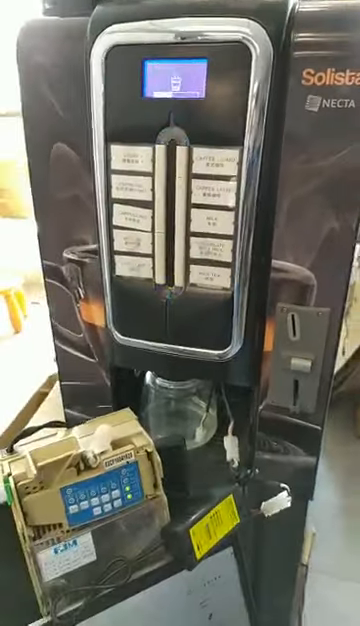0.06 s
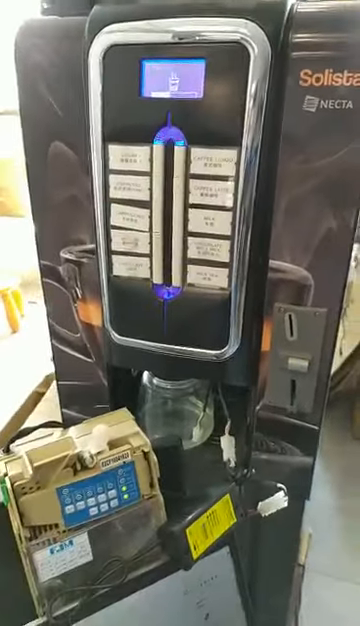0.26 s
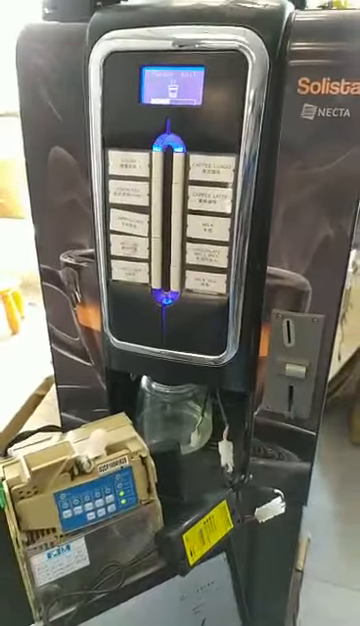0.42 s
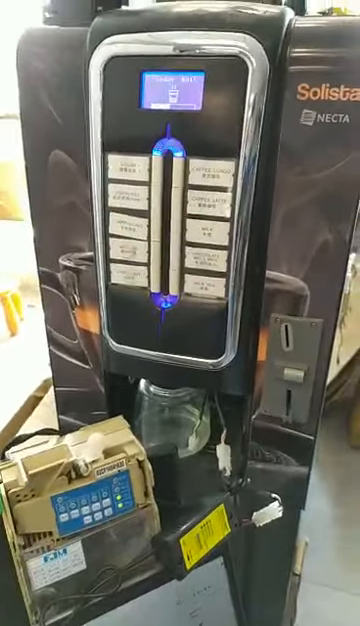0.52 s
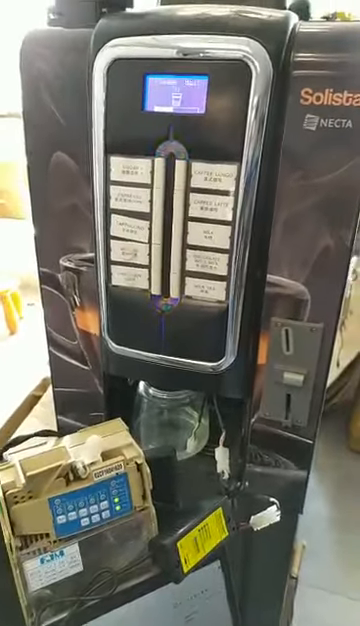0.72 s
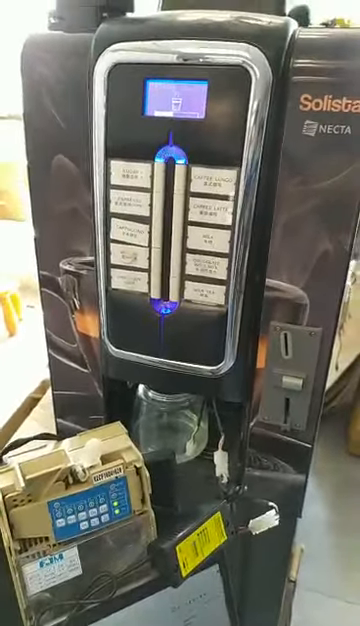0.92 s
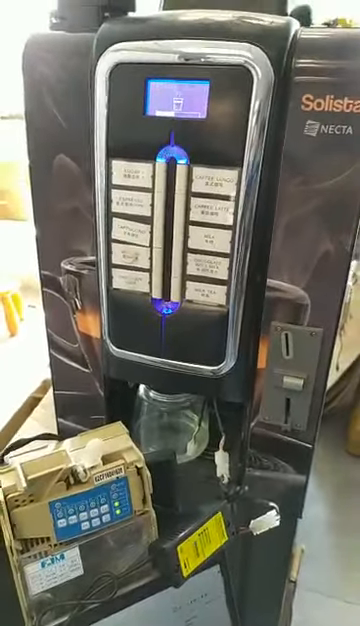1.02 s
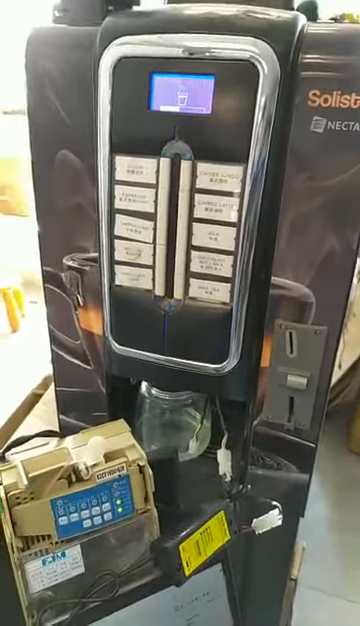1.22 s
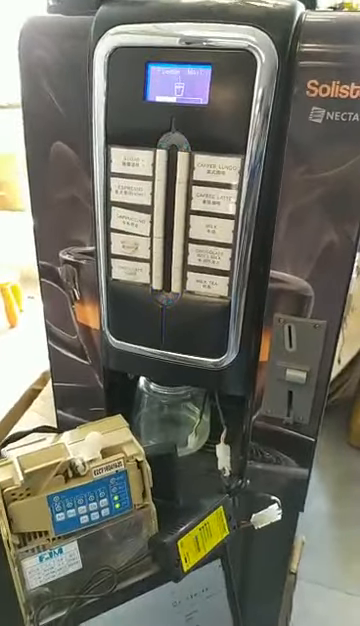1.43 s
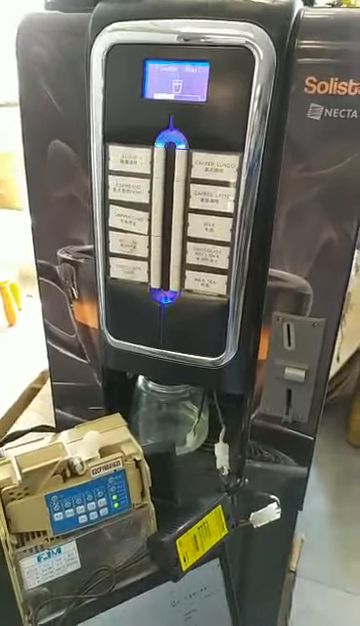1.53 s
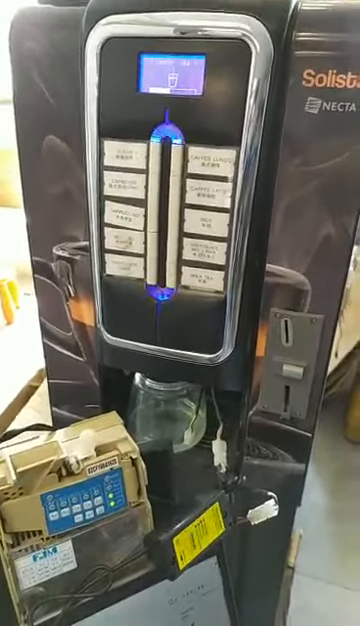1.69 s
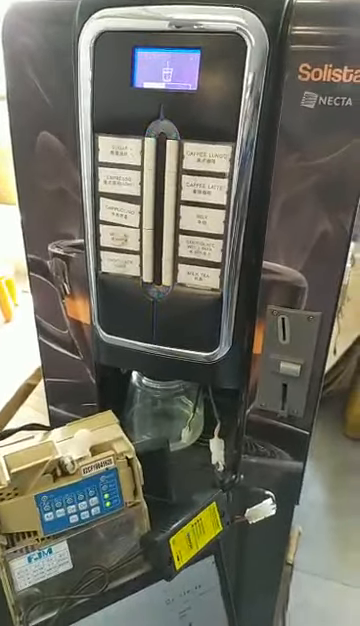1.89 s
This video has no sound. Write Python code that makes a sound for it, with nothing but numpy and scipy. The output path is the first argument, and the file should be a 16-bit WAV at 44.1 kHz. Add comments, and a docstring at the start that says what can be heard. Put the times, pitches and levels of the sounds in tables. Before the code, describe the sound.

Two hard metallic clacks from a drinks machine mechanism in a quiet, humming room.

```python
"""A quiet room with a drinks vending machine: a solenoid (a magnet that moves a metal plunger) pulls in
and, under a second later, lets go. Each stroke is a dull lead-in, then a hard, chattering clack that
rings the panels and thumps the cabinet; the room echoes briefly. Underneath run the room's air,
a low hum, a fan and a thin electrical whine. Faint ticks, a bump and a squeak come and go."""
import sys
import numpy as np
from scipy import signal
from scipy.fft import rfft, irfft, next_fast_len
from scipy.io import wavfile
from scipy.ndimage import uniform_filter1d, map_coordinates

SR = 44100
rng = np.random.default_rng(int(sys.argv[2]) if len(sys.argv) > 2 else 0)


def unload_audio(sound):
    """Save the sound as a 16-bit wav file, at the path given as the first command line argument."""
    columns = np.transpose(np.atleast_2d(sound))
    # keep every value between -1 and 1, then stretch to whole-number steps
    steps = np.round(np.clip(columns, -1, 1) * 32767)
    wavfile.write(sys.argv[1], SR, steps.astype(np.int16))


N = 85995

# tone colour of each noise: f/Hz, relative level/dB
AIR_COLOUR = [(150, -13), (250, -6.5), (370, -1), (550, -6), (800, -2.5), (1130, -7.5), (1400, -10.5),
              (2300, -9), (3000, -12), (4000, -12.5), (5500, -12), (8000, -16), (11000, -20.5),
              (14000, -26), (15800, -31)]
RUMBLE_COLOUR = [(20, -61), (33, -32), (45, -16), (70, 9.5), (110, -1), (165, 1), (230, -1), (320, -16),
                 (600, -52)]
KNOCK_COLOUR = [(150, -14), (450, -22), (680, -10), (830, -3), (1080, 7.5), (1350, -12.5), (2300, -11.5),
                (4200, -15), (6000, -16), (10000, -14), (15000, -33)]
TICK_COLOUR = [(1500, -25), (5000, -11), (11000, 7), (15500, -8)]
PULL_IN_COLOUR = [(180, -36), (300, -3.5), (592, -14.5), (990, 1), (1380, -18.5), (1710, -11.5),
                  (2770, -9.5), (3160, -9.5), (4120, 1.5), (4870, -7.5), (6040, -5), (7010, -8),
                  (14100, -12.5), (15800, -14)]
RELEASE_COLOUR = [(180, -47), (300, -23), (643, -14), (1090, 0), (1430, -20.5), (1710, -6.5), (2680, -13.5),
                  (2960, -4), (3210, -9.5), (3490, -4.5), (5290, -10), (5840, -11), (9770, -10.5),
                  (15800, -19.5)]
THUMP_COLOUR = [(40, -22), (90, -0.5), (140, 2), (215, 0.5), (330, -9.5), (600, -15.5), (1500, -64)]
BUMP_COLOUR = [(200, -21), (400, -6), (620, 9), (1000, -9), (2600, -9), (6000, -30)]
# how the background sounds swell and fade: t/s, level/dB
AIR_LEVEL = [(0, -56.5), (.15, -60.5), (.6, -60), (1.0, -60), (1.65, -60.5), (1.8, -58), (1.95, -53.5)]
RUMBLE_LEVEL = [(0, -52.5), (.15, -59), (1.0, -59.5), (1.7, -57.5), (1.95, -56.5)]
HUM_LEVEL = [(0.0, -64), (0.232, -55.5), (0.324, -50.5), (0.346, -65), (0.384, -53.5), (0.444, -48.5),
             (0.694, -43.5), (0.896, -56), (0.944, -73), (1.188, -47.5), (1.226, -69), (1.254, -52.5),
             (1.504, -48.5), (1.53, -55), (1.77, -52.5), (1.95, -55)]
WHINE_SWELL = [(0, 0), (.6, 0.5), (1.3, 0), (1.7, 0.5), (1.95, -4)]
# tones of the fan blades and of the whine: multiple of the base pitch, level/dB
FAN_TONES = [(1, -75), (2, -77), (3, -67), (5, -77), (6, -83), (7, -83)]
WHINE_TONES = [(6, -75.5), (7, -69.5), (8, -73), (9, -75), (10, -77.5), (11, -78), (12, -79.5), (13, -78.5),
               (14, -82), (15, -84), (16, -85), (17, -91), (18, -92), (20, -89)]
# dull knocks and tiny ticks: t/s, level/dB
KNOCKS = [(.009, -39), (0.202, -31.5), (0.2108, -29), (1.0327, -33)]
TICKS = [(.009, -74), (.678, -54), (0.989, -54.5)]
# pull-in, then release: t/s, level/dB (rattle, panels, thump, chatter, dull blow), dull blow delay/s
STROKES = [(0.2171, -12.5, -23, -33.5, -17, -18, 0.00536), (1.0474, -16, -24.5, -39.5, -17, -12, 0.0026)]
# panel notes: f/Hz, pull-in level/dB, release level/dB, time to fade by 60 dB/s
PANEL_NOTES = [(530, -19, -20, 0.086), (744.4, -9.5, -25, 0.11), (815, -13.5, -10.5, 0.075),
               (955.7, -9.5, -6, 0.099), (1059, -14, -24, 0.023), (1122, -29, -9, 0.027),
               (1147, -18.5, -31, .08), (1706, -26, -6.5, 0.069), (3246, -3, -22, 0.056),
               (3472, -10, -18, 0.023), (4015, -8.5, -11, 0.072), (4376, -6, -4, 0.073),
               (4630, 2, -11, 0.033), (6130, -10, -21, 0.052)]
# the plunger's own notes as it hits: f/Hz, relative level/dB
PLUNGER_NOTES = [(560, -19), (1010, 3), (3850, -4)]
# the sinking drone: t/s, f/Hz, level/dB
DRONE = [(.24, 131.4, -85), (.33, 121.4, -50.5), (.42, 112, -57), (.5, 104.6, -57), (.62, 99, -57),
         (.75, 101, -63.5), (.98, 98.2, -64)]
# the room's echo: f/Hz, time to fade by 60 dB/s
ECHO_FADE = [(150, 0.54), (900, 0.21), (1700, 0.24), (4000, 0.28), (8000, 0.27), (15000, .22)]
# how alike left and right are, for background and blows: f/Hz, likeness (1 = the same)
ROOM_ALIKE = [(60, 1), (180, 0.98), (550, 0.32), (1650, 0.028), (4970, 0.048), (15000, 0.03)]
CLACK_ALIKE = [(150, 1), (500, 0.95), (1000, 0.12), (4000, 0.14), (12000, 0.017)]
# the lean to the left: f/Hz, left minus right level/dB
LEFT_LEAN = [(60, 1), (150, 1.3), (300, 2), (550, -2), (1000, 1.5), (2000, 4), (4000, 0.8), (8000, 3.6),
             (14000, 0)]


def amp(db):
    """Turn decibels into a gain."""
    return 10 ** (np.asarray(db) / 20)


def along(points, hz):
    """Look up a table at a frequency, on a log scale."""
    f, values = np.transpose(points)
    return np.interp(np.log(hz + 1), np.log(f + 1), values)


def clock():
    """The time of every sample."""
    return np.arange(N) / SR


def curves(rows):
    """Join a table's timed points into one curve per column."""
    times, *columns = np.transpose(rows)
    return [np.interp(clock(), times, column) for column in columns]


def wobble(rate):
    """A smooth curve through `rate` random points a second."""
    return map_coordinates(rng.standard_normal(400), [clock() * rate], mode="wrap")


def filtered(x, response):
    """Turn each frequency of x up or down by response(hz)."""
    size = next_fast_len(N + SR // 2)
    return irfft(rfft(x, size) * response(np.fft.rfftfreq(size, 1 / SR)), size)[..., :N]


def spread(alike, hz):
    """An angle that grows as left and right get less alike."""
    return np.arccos(np.clip(along(alike, hz), -1, 1)) / 2


def noise(colour, alike):
    """Coloured stereo noise of average power 1."""
    def response(hz):
        angle = spread(alike, hz)
        return amp(along(colour, hz)) * [np.cos(angle), np.sin(angle)]
    mid, side = filtered(rng.standard_normal((2, N)), response)
    stereo = np.array([mid + side, mid - side])
    return stereo / np.sqrt(np.mean(stereo ** 2) + 1e-20)


def tone(hz, alike, drift=0, rate=12):
    """A pure stereo tone of average power 1; drift makes it waver."""
    phase = 2 * np.pi * (np.cumsum(hz + np.zeros(N)) / SR + rng.random()) + drift * wobble(rate)
    apart = rng.choice([-1, 1]) * spread(alike, np.mean(hz))
    return np.sqrt(2) * np.sin(phase + np.array([[apart], [-apart]]))


def struck(at, rise, fade):
    """The loudness of a blow: a quick rise, then 60 dB down every `fade` seconds."""
    age = np.maximum(clock() - at, 0)
    return (1 - np.exp(-age / rise)) * amp(-60 * age / fade)


def air():
    """The room's air hisses and rumbles, a little louder at both ends."""
    hiss = amp(curves(AIR_LEVEL)[0]) * noise(AIR_COLOUR, ROOM_ALIKE)
    rumble = amp(curves(RUMBLE_LEVEL)[0]) * noise(RUMBLE_COLOUR, ROOM_ALIKE)
    return hiss + rumble


def hum(hz=52.9):
    """The machine's low hum swells and dips under a faint overtone."""
    low = amp(curves(HUM_LEVEL)[0]) * tone(hz, ROOM_ALIKE, drift=0.46)
    overtone = amp(-68.5 + 5.9 * wobble(9)) * tone(3 * hz, ROOM_ALIKE, drift=1.13)
    return low + overtone


def fan(blade_hz=367.3):
    """The fan's blades make slightly unsteady tones."""
    return sum(amp(db + 1.5 * wobble(9.38)) * tone(k * blade_hz, ROOM_ALIKE, drift=.35)
               for k, db in FAN_TONES)


def whine(base_hz=643.8):
    """The electronics give off thin, high overtones."""
    tones = sum(amp(db + 2.0 * wobble(5.65)) * tone(k * base_hz, ROOM_ALIKE, drift=.25)
                for k, db in WHINE_TONES)
    return amp(curves(WHINE_SWELL)[0]) * tones


def knocks():
    """Parts of the mechanism touch dully, hardest just before each stroke."""
    blows = sum(amp(db) * struck(at, rise=0.0023, fade=0.086) for at, db in KNOCKS)
    return blows * noise(KNOCK_COLOUR, CLACK_ALIKE)


def ticks():
    """Tiny ticks: short bursts of bright noise."""
    bursts = sum(amp(db) * struck(at, rise=0.00044, fade=0.022) for at, db in TICKS)
    return bursts * noise(TICK_COLOUR, CLACK_ALIKE)


def panels(lead_s=0.01304, rise_s=0.0021):
    """The panels stir as the plunger starts to move, then ring as it hits."""
    out = np.zeros((2, N))
    for stroke, (at, _, ring_db, *_) in enumerate(STROKES):
        for hz, *note_db, fade in PANEL_NOTES:
            octaves_up = np.log2(hz / PANEL_NOTES[0][0])  # a soft push stirs high notes less
            stir = amp(-4.5 - 3 * octaves_up) * struck(at - lead_s, rise_s, fade=0.086)
            ring = tone(hz, CLACK_ALIKE, drift=.7, rate=70)
            out += amp(ring_db + note_db[stroke]) * (stir + struck(at, rise_s, fade)) * ring
    return out


def plunger(bounces=5, gap_s=.0028, loss_db=6):
    """The plunger hits with a rattle and a dull blow, chattering in ever weaker bounces."""
    out = np.zeros((2, N))
    for stroke, colour in zip(STROKES, (PULL_IN_COLOUR, RELEASE_COLOUR)):
        at, rattle_db, _, _, chatter_db, blow_db, delay = stroke
        rattle = amp(rattle_db) * struck(at, rise=0.0041, fade=0.072)
        bounce_times = at + gap_s * (1 + np.arange(bounces) + rng.uniform(-0.21, 0.204, bounces))
        chatter = sum(amp(chatter_db - k * loss_db) * struck(t, rise=.0001, fade=0.0049)
                      for k, t in enumerate(bounce_times))
        out += (rattle + chatter) * noise(colour, CLACK_ALIKE)
        notes = sum(amp(blow_db + db) * tone(hz, CLACK_ALIKE) for hz, db in PLUNGER_NOTES)
        out += struck(at + delay, rise=0.0021, fade=0.013) * notes
    return out


def cabinet():
    """Each stroke shakes a slow, low thump out of the cabinet."""
    thumps = sum(amp(db) * struck(at, rise=0.01, fade=0.36) for at, _, _, db, *_ in STROKES)
    return thumps * noise(THUMP_COLOUR, CLACK_ALIKE)


def held_tones():
    """A sinking drone and a thin tone last while the solenoid is held in."""
    held = (clock() > STROKES[0][0]) & (clock() < STROKES[1][0])
    soft_switch = uniform_filter1d(held.astype(float), size=2000)
    drone_hz, drone_db = curves(DRONE)
    drone = amp(drone_db) * tone(drone_hz, ROOM_ALIKE)
    thin = amp(-68.5) * tone(894, ROOM_ALIKE, drift=0.27)
    return soft_switch * (drone + thin)


def bump():
    """A faint, soft bump between the two strokes."""
    return amp(-54) * struck(at=.652, rise=0.0089, fade=0.32) * noise(BUMP_COLOUR, CLACK_ALIKE)


def squeak():
    """One short, wavering squeak near the end."""
    note = tone(3077, ROOM_ALIKE, drift=1.2, rate=130)
    return amp(-54) * struck(at=1.688, rise=0.0023, fade=.1) * note


def room_echo(sound, rise_s=0.0027):
    """The room adds a short, blurred echo; each frequency dies at its own speed."""
    hz, t, spectrum = signal.stft(rng.standard_normal((2, SR // 2)), SR, nperseg=256)
    shape = amp(-60 * t / along(ECHO_FADE, hz)[:, None]) * (1 - np.exp(-t / rise_s))
    tail = signal.istft(spectrum * shape, SR, nperseg=256)[1]
    return signal.fftconvolve(sound, tail / np.linalg.norm(tail[0]), axes=1)[:, :N]


def scene():
    """The machine, a little to the left, in its room."""
    background = air() + hum() + fan() + whine()
    hits = knocks() + ticks() + panels() + plunger() + bump() + squeak()
    mix = background + hits + cabinet() + held_tones() + amp(-7) * room_echo(hits)
    return filtered(mix, lambda hz: amp(np.array([[.5], [-.5]]) * along(LEFT_LEAN, hz)))


def record(dry, top_hz=15900, edge_hz=500):
    """Smoothly cut off the very highest treble."""
    return filtered(dry, lambda hz: np.sin(np.pi / 2 * np.clip(.5 + (top_hz - hz) / edge_hz, 0, 1)) ** 2)


dry = scene()
out = record(dry)
unload_audio(out)
```